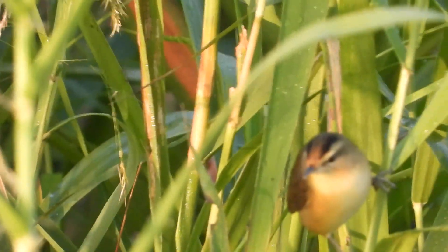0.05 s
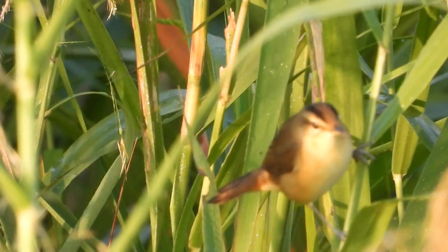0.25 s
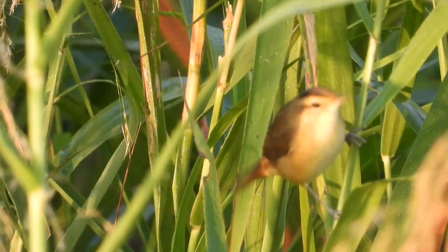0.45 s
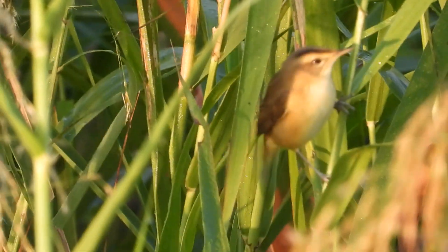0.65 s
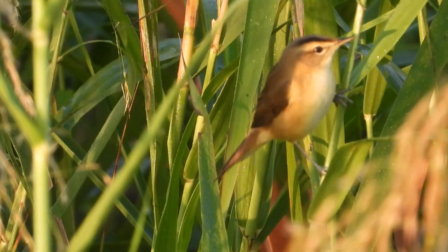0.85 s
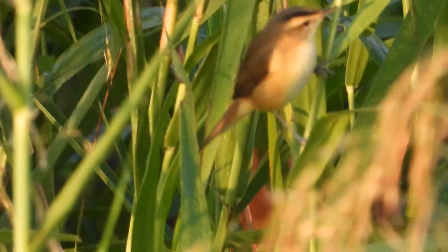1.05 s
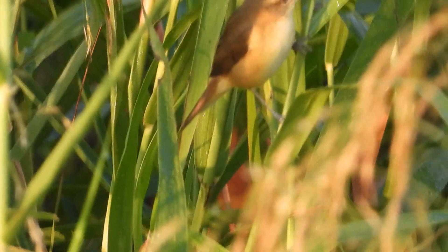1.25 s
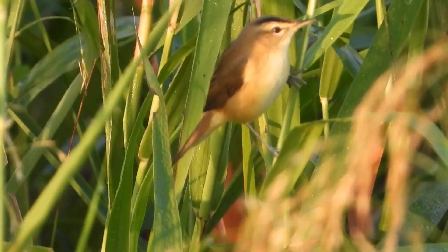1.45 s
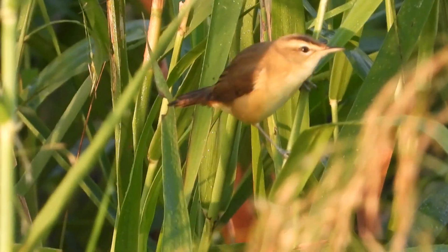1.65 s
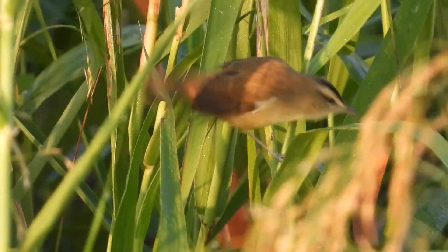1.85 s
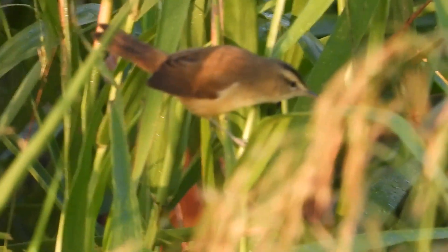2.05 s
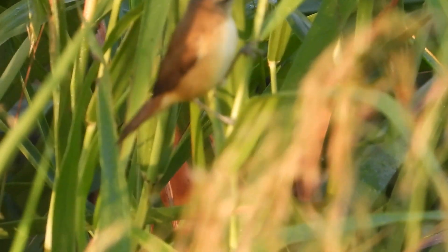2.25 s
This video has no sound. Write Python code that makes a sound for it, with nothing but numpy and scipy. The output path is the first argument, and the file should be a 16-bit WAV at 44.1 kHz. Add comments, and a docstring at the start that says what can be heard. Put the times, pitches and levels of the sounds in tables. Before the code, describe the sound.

A small bird whistles high notes and harsh rattles among reeds outdoors.

```python
"""A reed bed, a small warbler close to a stereo microphone, far birds over a soft outdoor hush.
Twice its syrinx gives a high whistle and a lower falling slur; a harsh rattle of clicks rings its
throat under the first whistle. A long buzzy slide follows and clears into a pure tone while stems
knock and leaves tick. After a pause come two more rattles in the same rhythm, then one soft trill.
The reeds scatter each call into a short tail."""
import sys
import numpy as np
from scipy import signal
from scipy.fft import rfft, irfft, next_fast_len
from scipy.io import wavfile
from scipy.ndimage import uniform_filter1d, map_coordinates

SR = 44100
rng = np.random.default_rng(int(sys.argv[2]) if len(sys.argv) > 2 else 0)


def inscribe(sig):
    """Save sig as 16-bit PCM at rate SR to the path in sys.argv[1].

    A 1-D sig is mono; a 2-D sig holds one channel per row.
    Samples are clipped to [-1, 1] before scaling.
    """
    pcm = np.round(np.clip(np.atleast_2d(sig).T, -1, 1) * 32767)
    wavfile.write(sys.argv[1], SR, pcm.astype(np.int16))


N = 101429

SOFT_WET_DB, CLICK_WET_DB = -9, -21.5  # reed-bed tail of the faint calls and of the clicking sounds


def amp(db):
    """Decibels to gain."""
    return 10 ** (np.asarray(db) / 20)


def unit(x):
    """Scale to rms 1."""
    return x / np.sqrt(np.mean(x ** 2) + 1e-20)


def along(points, hz):
    """Read (freq_hz, value) points on a log axis."""
    freqs, values = np.transpose(points)
    return np.interp(np.log(hz + 1), np.log(freqs + 1), values)


def clock():
    """Time of every sample in seconds."""
    return np.arange(N) / SR


def wobble(rate):
    """A smooth random curve, rate knots a second."""
    return map_coordinates(rng.standard_normal(int(N * rate / SR) + 4), [clock() * rate])


def tone(hz):
    """A sine of rms 1 that follows a pitch curve."""
    return np.sqrt(2) * np.sin(2 * np.pi * np.cumsum(hz) / SR)


def arch(start, length):
    """A rounded swell and fade."""
    return np.sin(np.pi * np.clip((clock() - start) / length, 0, 1))


def puff(start, peak_s):
    """A quick rise to 1 and an exponential fall."""
    age = np.maximum(clock() - start, 0) / peak_s
    return age * np.exp(1 - age)


def filtered(x, response):
    """x through a complex response of frequency."""
    size = next_fast_len(N + SR // 2)
    return irfft(rfft(x, size) * response(np.fft.rfftfreq(size, 1 / SR)), size)[..., :N]


def bursts(envelope, colour):
    """Noise that follows an envelope, then rings through a colour."""
    noise = rng.standard_normal(N)
    return filtered(envelope * noise, colour) / filtered(noise, colour).std()


def panned(pan_db):
    """Left and right gains whose mean is 1; positive pan_db is to the left."""
    gains = amp(np.array([[.5], [-.5]]) * pan_db)
    return gains / gains.mean(axis=0)


def mic_ports(x):
    """At the microphone's two ports the left leads below about 3 kHz, the right above."""
    # phase between the ports: freq_hz, left_lead_rad
    port_phase = [(500, 0.5), (2200, 0.83), (2900, 0.4), (4500, -1.65), (8000, -1.7), (15000, -2.5)]
    return filtered(x, lambda hz: np.exp(1j * np.array([[.5], [-.5]]) * along(port_phase, hz)))


def reeds(x, wet_db, scatter_t60_s=0.035, scatter_db=-8, first_echo_s=.006, spread=0.68):
    """Direct sound, quick scatter off near stems and a longer tail from the reed bed."""
    # decay of the reed bed: freq_hz, t60_s
    decay = [(300, 0.083), (2000, 0.36), (2600, 0.4), (2950, 0.24), (3600, 0.39), (4500, .45), (7000, 0.47),
             (14000, 0.17)]
    hz, t, spectra = signal.stft(rng.standard_normal((2, SR // 2)), SR, nperseg=256)
    tail = signal.istft(spectra * amp(-60 * t / along(decay, hz)[:, None]), SR, nperseg=256)[1]
    near = rng.standard_normal(tail.shape) * amp(-60 * np.arange(tail.shape[1]) / SR / scatter_t60_s)
    tail = amp(wet_db) * tail / np.linalg.norm(tail[0])
    near = amp(scatter_db) * near / np.linalg.norm(near[0])
    mid, side = tail + near
    echo = (mid + spread * np.array([[1], [-1]]) * side) / np.hypot(1, spread)
    echo = np.pad(echo, ((0, 0), (int(first_echo_s * SR), 0)))
    return mic_ports(x + signal.fftconvolve(x, echo, axes=1)[:, :N])


def rush(spectrum, patchy_db):
    """Stereo noise of rms 1 with patches of random gain, wider toward the treble."""
    # likeness of left and right: freq_hz, correlation
    likeness = [(100, 0.95), (700, 0.65), (2000, 0.5), (4500, 0.096), (10000, 0.091)]
    spectra = signal.stft(rng.standard_normal((2, N)), nperseg=512)[2]
    patches = uniform_filter1d(rng.standard_normal(spectra.shape[1:]), size=5, axis=0)
    patches = uniform_filter1d(patches, size=12, axis=1)
    pair = signal.istft(spectra * amp(patchy_db * unit(patches)), nperseg=512)[1][:, :N]
    turn = lambda hz: np.arccos(np.clip(along(likeness, hz), -1, 1)) / 2
    colour = lambda hz: amp(along(spectrum, hz)) * [np.cos(turn(hz)), np.sin(turn(hz))]
    mid, side = filtered(pair, colour)
    return unit(np.array([mid + side, mid - side]))


def marsh(hush_db=-45.5, left_lead_s=.00007):
    """A steady outdoor hush, a little to the left, and a high hiss that comes and goes."""
    # colour of the hush: freq_hz, relative_db
    hush_colour = [(15, -67), (25, -62.5), (53, -55), (96, -32), (189, -9), (332, -12), (554, -15.5),
                   (618, -8.5), (688, -16.5), (766, -9.5), (950, -18.5), (1120, -8), (1240, -10.5),
                   (1720, -9), (2580, -19), (3200, -14.5), (3960, -10.5), (4300, -8), (6270, -20),
                   (11700, -45.5), (15700, -81.5)]
    # where the hush sits: freq_hz, pan_db
    hush_pan = [(60, -6.5), (180, -1), (550, 0), (1650, 5.5), (4970, 1.5), (15000, 4)]
    # colour of the hiss: freq_hz, relative_db
    hiss_colour = [(2000, -64.5), (5000, 6.5), (7500, -4), (10000, -9), (12000, -17), (15000, -24.5)]
    # rise and fall of the hiss: time_s, level_db
    hiss_level = [(0, -53), (0.299, -54.5), (0.618, -54), (.74, -51.5), (.8, -67.5), (1.15, -68),
                  (1.2, -62.5), (1.26, -66), (1.678, -60.5), (1.731, -57), (1.78, -59), (2.3, -67.5)]
    lead = lambda hz: np.exp(1j * np.pi * np.array([[1], [-1]]) * hz * left_lead_s)
    hush = filtered(rush(hush_colour, patchy_db=2.8), lambda hz: panned(along(hush_pan, hz)) * lead(hz))
    hiss_db = np.interp(clock(), *np.transpose(hiss_level))
    return amp(hush_db) * hush + amp(hiss_db) * rush(hiss_colour, patchy_db=3.0)


def far_birds(chirp_swing_hz=500, call_waver=.2):
    """Far across the marsh: faint gliding chirps and low calls with an unsteady pitch."""
    # thin chirps: start_s, length_s, first_hz, last_hz, level_db, roughness
    chirp_rows = [(-.03, 0.09, 2240, 2064, -38, 0.04), (0.23, 0.072, 6750, 5580, -51, .2),
                  (0.943, 0.034, 2940, 2310, -53, 0.1), (1.064, 0.014, 3330, 3280, -44.5, 0.03),
                  (1.081, 0.011, 3600, 3840, -47, 0.11), (1.141, 0.036, 3400, 2690, -54, 0.2),
                  (1.222, 0.014, 3310, 3210, -42.5, 0.14), (1.257, 0.013, 3500, 2370, -49.5, .05),
                  (1.286, 0.032, 3150, 2500, -53, .05), (1.635, 0.027, 4400, 2920, -46.5, .05),
                  (1.813, 0.044, 3490, 2770, -47, 0.6), (1.882, 0.043, 6300, 5440, -51.5, 0.3),
                  (1.961, 0.032, 3200, 2370, -54.5, .05), (2.027, 0.02, 6480, 5670, -48, 0.6),
                  (2.061, 0.042, 5600, 7350, -49.5, 0.67), (2.207, 0.047, 5100, 4364, -47, 0.4)]
    # dull low calls: start_s, length_s, pitch_hz, level_db, roughness
    call_rows = [(0.684, 0.03, 1013, -41, 0.15), (0.719, 0.055, 440, -51.5, 0.36),
                 (0.782, 0.023, 840, -41.5, 0.35), (0.852, 0.03, 320, -46, 0.76),
                 (0.861, 0.09, 440, -49, 0.8), (0.902, 0.058, 330, -48.5, 0.75),
                 (0.874, .08, 700, -47, 0.6), (0.99, 0.22, 750, -52, 0.4), (1.197, 0.16, 770, -51.5, 0.3),
                 (1.9, 0.047, 750, -45, 0.09), (1.968, 0.065, 660, -50.5, 0.04),
                 (2.104, 0.058, 765, -42.5, 0.08), (2.141, 0.19, 760, -51, 0.12)]
    chirps, calls = np.zeros((2, N))
    for start, length, first, last, db, rough in chirp_rows:
        glide = np.interp(clock(), [start, start + length], [first, last])
        chirps += amp(db) * arch(start, length) * tone(glide + chirp_swing_hz * rough * wobble(900))
    for start, length, hz, db, rough in call_rows:
        waver = 1 + call_waver * np.tanh(2 * rough * wobble(300))
        calls += amp(db) * arch(start, length) * tone(hz * waver)
    return reeds(panned(1) * chirps + panned(0) * calls, SOFT_WET_DB)


def trill(start_s=1.683, length_s=.066, pitch_hz=3760, rate_hz=100, swing_hz=141, depth=0.73):
    """One soft, buzzy trill to the right, with a rough upper edge; each pulse dips in pitch."""
    beat = np.cos(2 * np.pi * rate_hz * (clock() - start_s))
    level = amp(-36) * np.abs(arch(start_s, length_s)) ** 0.23 * (1 - depth * beat) / 2
    voice = tone(pitch_hz + swing_hz * beat + 140 * wobble(1200))
    edge = amp(-4.5) * tone(4600 + 520 * wobble(1500))
    return reeds(panned(-7.5) * level * (voice + edge), SOFT_WET_DB)


def stems(peak_s=.003):
    """Reed stems knock and dry leaves tick as the bird shifts on its perch."""
    # movements on the perch: start_s, knock_db, crackle_db
    ticks = [(.305, -74, -50), (.634, -33, -55.5), (.680, -34, -44.5), (.702, -36.5, -45),
             (1.008, -69, -54), (1.177, -70, -46.5), (1.193, -65.5, -50.5), (1.213, -65, -49),
             (1.71, -73, -46), (1.735, -68, -46.5)]
    # knock of a reed stem: freq_hz, relative_db
    stem_colour = [(40, -59), (130, -35.5), (300, -9), (600, -16.5), (1000, 2.5), (1350, 0), (2000, -13),
                   (3000, -22), (6000, -40.5)]
    # crackle of a dry leaf: freq_hz, relative_db
    leaf_colour = [(1500, -41), (3000, -5), (5000, 1.5), (8000, 3), (10000, -9.5), (12000, -16.5),
                   (15000, -29.5)]
    knock_level = sum(amp(db) * puff(start, peak_s) for start, db, _ in ticks)
    crackle_level = sum(amp(db) * puff(start, peak_s) for start, _, db in ticks)
    knocks = bursts(knock_level, lambda hz: amp(along(stem_colour, hz)))
    crackles = bursts(crackle_level, lambda hz: amp(along(leaf_colour, hz)))
    return reeds(panned(-1) * (knocks + crackles), CLICK_WET_DB)


def rattles(noise_db=-16.5, noise_fade_in_s=.018, noise_length_s=0.14, edge_db=-5.5, low_cut_hz=83):
    """Runs of sharp clicks over faint noise ring the throat, each with a bright edge."""
    # the runs: start_s, level_db, treble_db, change_by_end_db
    runs = [(0.099, -18, 0, -4), (1.3572, -19, 0.5, -1), (1.499, -18.5, 0, -1)]
    # clicks of one run: offset_s, relative_db, treble_db
    clicks = [(-.0005, -6.5, 3.5), (.0095, -3.5, -10.5), (0.014, -5.5, 0), (0.022, -9, 4.5),
              (0.04, -4.5, -7), (0.0446, 0.5, -1), (0.065, -4.5, -0.5), (0.069, -8, -11), (0.077, -5, -2.5),
              (0.0853, -8.5, 5.5), (.093, -12, -3), (0.105, -10, -6.5)]
    # throat resonances: centre_hz, width_hz, relative_db
    resonances = [(344, 140, -18.5), (715, 286, -11), (1567, 200, 2.5), (2375, 163, 3), (3280, 216, 3),
                  (4610, 680, -13)]
    # bright edge of a click: freq_hz, relative_db
    edge_colour = [(1500, -48.5), (3500, -14), (5400, 4), (6500, -1.5), (8000, 1.5), (9500, -11),
                   (12000, -16.5), (15500, -27.5)]
    # where the rattles sit: freq_hz, pan_db
    rattle_pan = [(600, 0.5), (1300, -4), (2500, -7.5), (4500, -3), (12000, -0.5)]
    body_power, edge_power = np.zeros((2, N))
    for start, db, bright_db, change_db in runs:
        # faint noise swells just before the first click
        noise_power = amp(db + noise_db) ** 2 * np.abs(arch(start - noise_fade_in_s, noise_length_s))
        body_power += noise_power
        edge_power += noise_power
        for offset, click_db, treble_db in clicks:
            fade_db = change_db * offset / clicks[-1][0]
            click = amp(db + click_db + fade_db) * puff(start + offset, peak_s=0.002)
            body_power += click ** 2
            edge_power += (click * amp(treble_db + bright_db)) ** 2
    throat = lambda hz: sum((-1) ** k * amp(db) * 1j * hz * width / (f0 ** 2 - hz ** 2 + 1j * hz * width)
                            for k, (f0, width, db) in enumerate(resonances))
    body = bursts(np.sqrt(body_power), throat)
    edge = amp(edge_db) * bursts(np.sqrt(edge_power), lambda hz: amp(along(edge_colour, hz)))
    low_cut = lambda hz: hz ** 2 / np.hypot(hz ** 2, low_cut_hz ** 2)
    placed = filtered(body + edge, lambda hz: panned(along(rattle_pan, hz)) * low_cut(hz))
    return reeds(placed, CLICK_WET_DB)


def whistle(shape, start, buzz_shift_hz=0, creak=0, fade_s=0.0013):
    """A clear tone from the syrinx; roughness shakes it and hands its energy to a fluttering buzz."""
    flutter_hz, flutter_scatter, buzz_swing_hz, buzz_depth = 219, 0.736, 167.3, 0.59
    creak_drop_hz, creak_swing_hz = 719, 389.5  # the rough voice breaks irregularly below its pitch
    tremor_hz, tremor_db = 73, 4.5  # unsteadiness at full roughness
    times, hz, db, rough = np.transpose(shape)
    t = clock() - start
    hz, db, rough = [np.interp(t, times, curve) for curve in (hz, db, np.clip(rough, 0, 1))]
    flutter_phase = 2 * np.pi * np.cumsum(flutter_hz * (1 + 0.25 * wobble(150))) / SR
    flutter = np.sin(flutter_phase) + flutter_scatter * wobble(700)
    buzz = unit((1 + buzz_depth * flutter) * tone(hz + buzz_shift_hz + buzz_swing_hz * flutter))
    breaks = creak * wobble(600) * tone(hz - creak_drop_hz + creak_swing_hz * np.tanh(wobble(1100)))
    clear = amp(tremor_db * rough * wobble(180)) * tone(hz + tremor_hz * rough * wobble(200))
    gate = np.clip(np.minimum(t - times[0], times[-1] - t) / fade_s + 1, 0, 1)
    return gate * amp(db) * (np.sqrt(1 - rough ** 2) * clear + rough * unit(buzz + breaks))


def song():
    """The warbler, close and a little to the right: two whistle-and-slur pairs, then the long slide."""
    # one high whistle: offset_s, pitch_hz, relative_db, roughness
    high_shape = [(0, 4564, -12.5, 0.3), (.016, 4545, -7, 0.05), (.026, 4484, 5.5, 0),
                  (.041, 4534, -6.5, 0), (.048, 4627, 5.5, 0), (.056, 4587, -2, 0.2), (.065, 4700, 0, 0.35),
                  (.079, 4482, -6, 0.8), (.092, 4330, -8, 0.6)]
    # high whistles: start_s, level_db, pan_db
    high_notes = [(.094, -18.5, -3.5), (.335, -18.5, -2)]
    # one low slur: offset_s, pitch_hz, relative_db, roughness
    low_shape = [(0, 2910, -23.5, 0.2), (.016, 2860, -5.5, .08), (.03, 2830, 9, 0.1),
                 (.042, 2725, -4.5, 0.1), (.054, 2650, 5, .03), (.068, 2570, -8, .04),
                 (.082, 2420, -16.5, .04), (.11, 2340, -22, .04)]
    # low slurs: start_s, level_db, pan_db
    low_notes = [(.184, -26.5, -5.5), (0.428, -27, -6)]
    # the long slide: time_s, pitch_hz, level_db, roughness
    slide_shape = [(.579, 4640, -31.5, 0.5), (.595, 4580, -36, 0.25), (.599, 4550, -22.5, 0.2),
                   (.612, 4480, -28.5, 0.5), (.626, 4440, -22.5, 0.5), (.645, 4330, -28, 0.7),
                   (.665, 4290, -25.5, 0.51), (.692, 4200, -28.5, 0.83), (.705, 4160, -24.5, 0.8),
                   (.73, 4030, -29, 0.8), (.745, 4000, -25, 0.9), (.762, 3980, -27, 0.8),
                   (.773, 3950, -25.5, 0.2), (.79, 3880, -26.5, 0.7), (.805, 3788, -28, 0.05),
                   (.834, 3733, -27.5, 0), (.84, 3708, -16, 0), (.857, 3600, -23, 0.02),
                   (.877, 3518, -24, 0.04), (.9, 3467, -35, 0.05)]
    slide = panned(-1.5) * whistle(slide_shape, 0, buzz_shift_hz=-370, creak=amp(-8.5))
    highs = sum(amp(db) * panned(pan_db) * whistle(high_shape, start, buzz_shift_hz=60.15)
                for start, db, pan_db in high_notes)
    upper_voice = reeds(slide + highs, wet_db=-9)
    lows = sum(amp(db) * panned(pan_db) * whistle(low_shape, start) for start, db, pan_db in low_notes)
    return upper_voice + reeds(lows, wet_db=-10)


def scene():
    """Everything at the microphone."""
    return song() + rattles() + stems() + trill() + far_birds() + marsh()


def record(dry, low_cut_hz=36, top_hz=15820):
    """The recorder cuts the deep bass and keeps nothing above its band limit."""
    return filtered(dry, lambda hz: (hz < top_hz) * hz ** 2 / np.sqrt(hz ** 4 + low_cut_hz ** 4))


dry = scene()
out = record(dry)
inscribe(out)
```